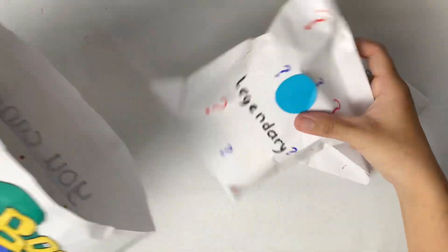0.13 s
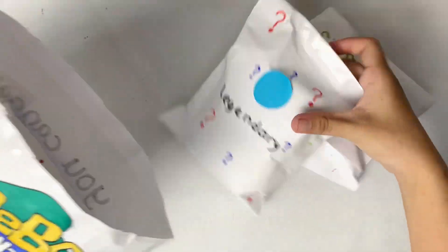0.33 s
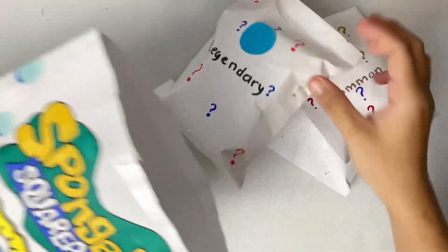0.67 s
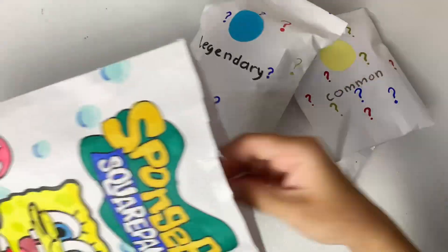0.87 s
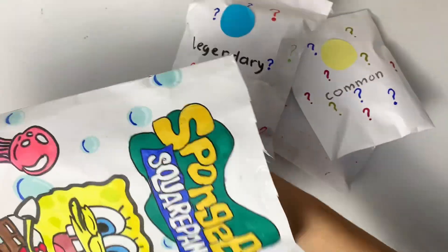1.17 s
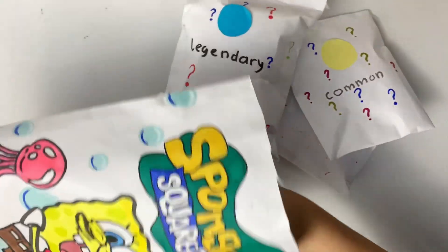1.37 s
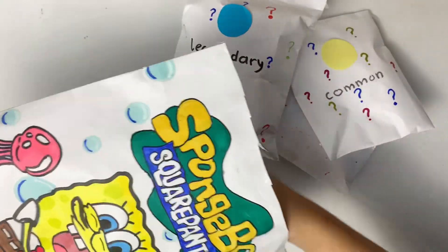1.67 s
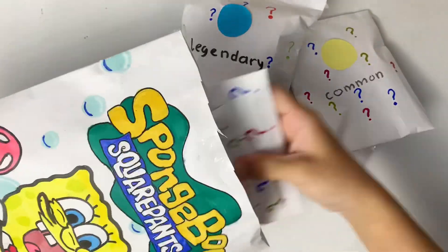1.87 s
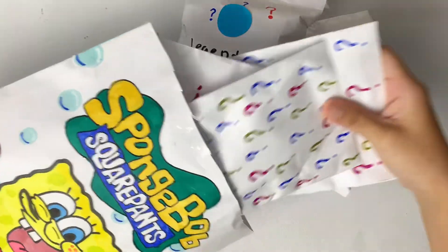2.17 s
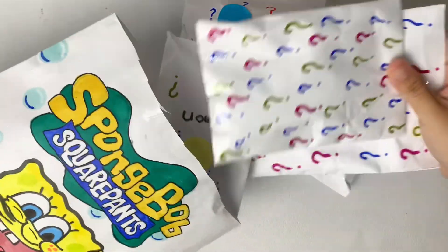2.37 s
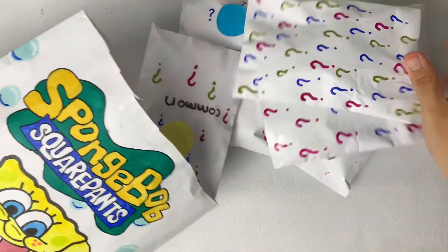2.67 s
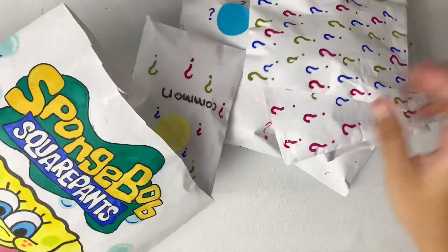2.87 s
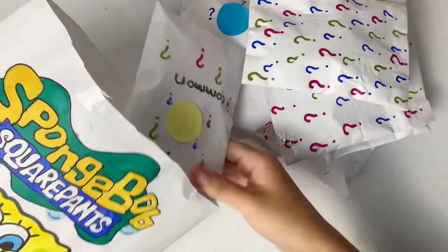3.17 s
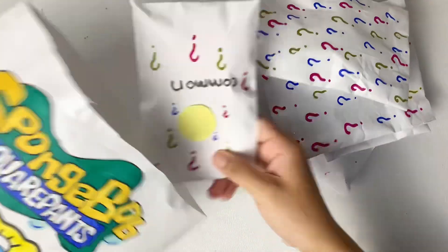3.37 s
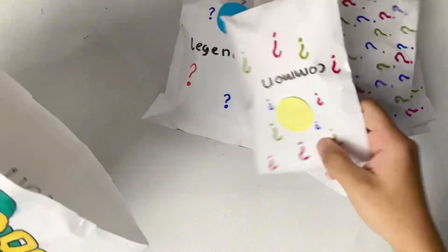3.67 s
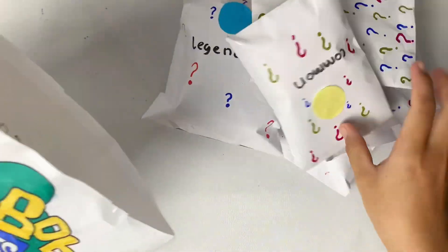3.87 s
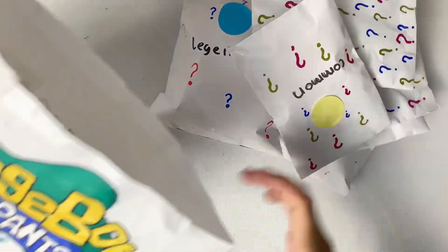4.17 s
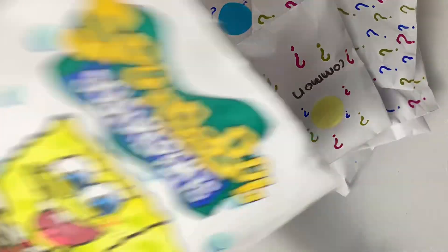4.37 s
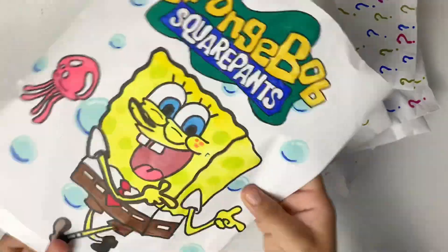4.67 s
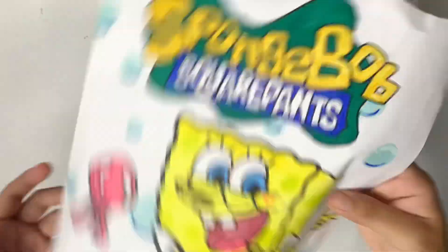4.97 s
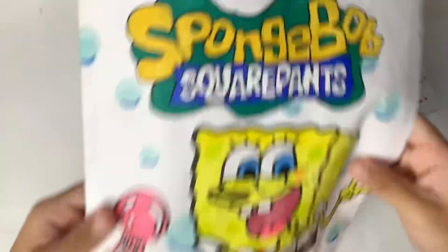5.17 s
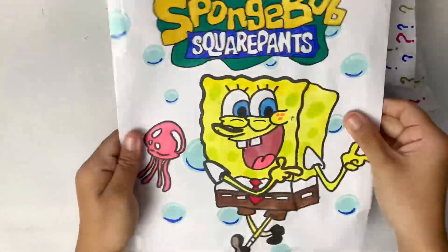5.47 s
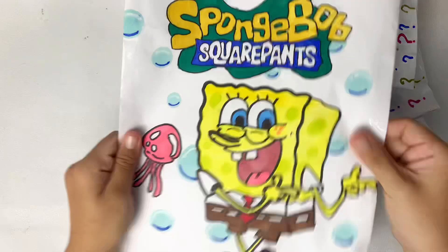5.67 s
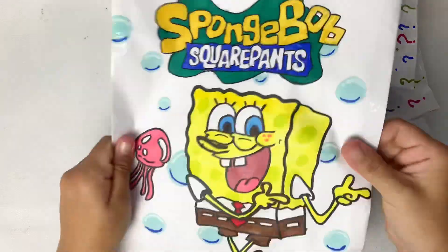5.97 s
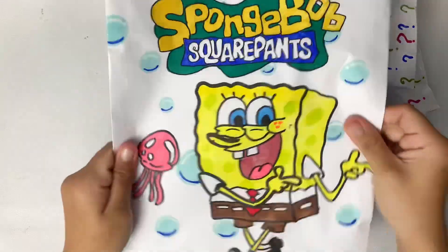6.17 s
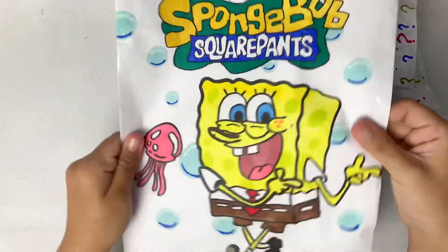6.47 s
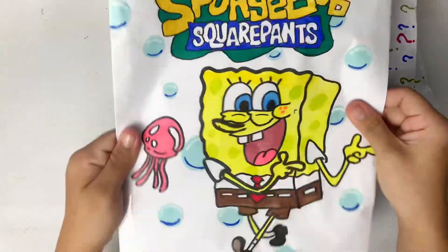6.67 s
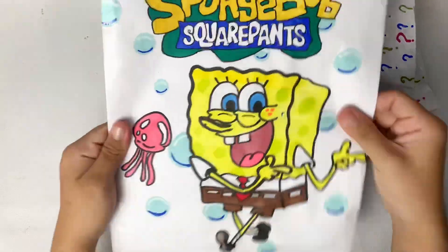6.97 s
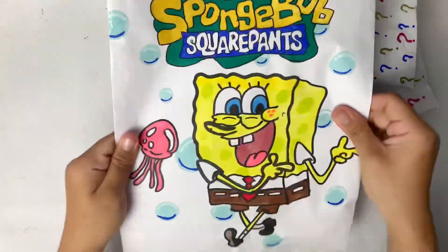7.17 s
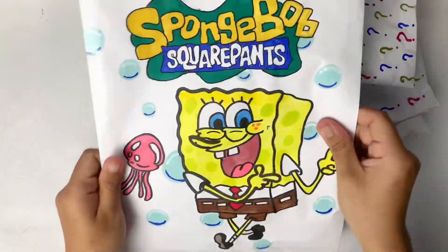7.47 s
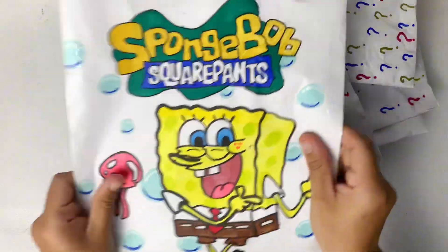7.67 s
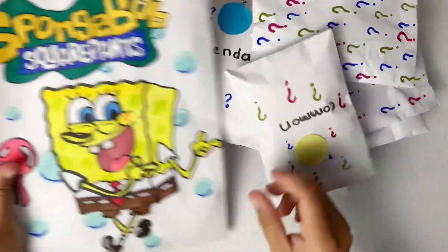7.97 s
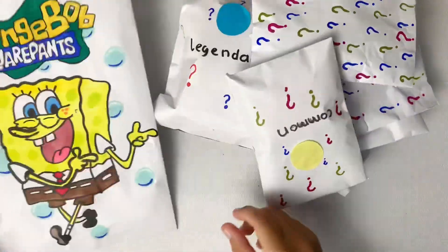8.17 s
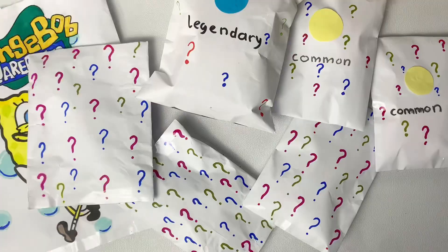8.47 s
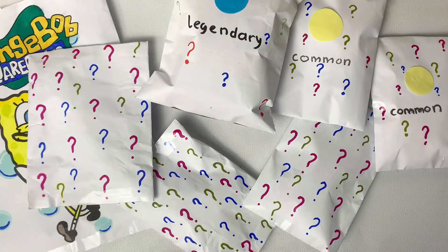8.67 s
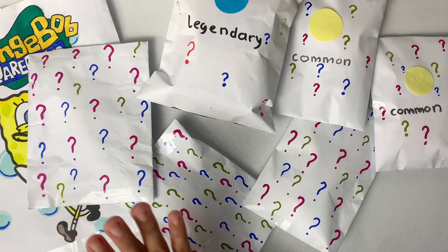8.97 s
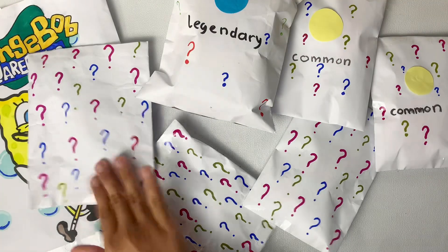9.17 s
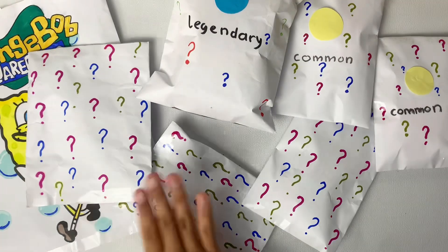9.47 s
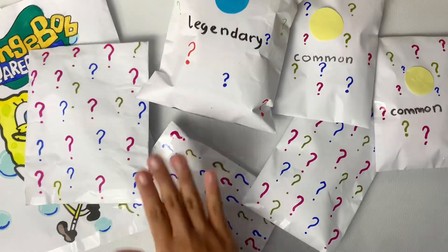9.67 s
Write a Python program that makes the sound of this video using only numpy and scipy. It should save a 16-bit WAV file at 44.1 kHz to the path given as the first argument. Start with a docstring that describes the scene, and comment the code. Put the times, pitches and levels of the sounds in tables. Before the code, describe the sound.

Stiff paper bags crinkle, snap and pop hollowly close to the microphone, slid from a big pouch that is then flexed, ending in soft pats over a low hum.

```python
"""Stiff paper snaps, flaps and pops hollowly right at the microphone, while sheets hiss and crinkle.
Handmade paper bags are slid out of a big pouch and laid on a table, the pouch is lifted and flexed,
and a hand pats the bags at the end. Noisy slips ring the resonances of the paper; noise and grains make it rustle.
A small room answers briefly with decaying noise. Under it all lie air and a low rumble of shaped noise,
joined from 8.46 s to the end by a drone of wavering sines. Two microphone ports pick it up."""
import sys
import numpy as np
from scipy import signal
from scipy.fft import rfft, irfft, next_fast_len
from scipy.io import wavfile

SR = 44100
rng = np.random.default_rng(int(sys.argv[2]) if len(sys.argv) > 2 else 0)


def generate_wav(sig):
    """Save sig (samples, or channels by samples) to the path in sys.argv[1] as 16-bit PCM at SR."""
    pcm = np.round(np.clip(np.atleast_2d(sig).T, -1, 1) * 32767).astype(np.int16)
    wavfile.write(sys.argv[1], SR, pcm)


N = 433062
TIME = np.arange(N) / SR

# buckles of the paper: (time [s], strength [dB], brightness [dB per octave], crispness [0-1])
BUCKLES = [(0.004, -15, 1, 0.42), (0.103, -35, 1, 0.8), (0.275, -28.5, -1.5, 0), (0.385, -30, -3, 0.4),
           (0.54, -26.5, 3, 0.2), (0.933, -13, 4.5, 0), (0.96, -18.5, -2, 0), (0.972, -11, 2.5, 0.5),
           (0.985, -22.5, 0, 0.81), (1.123, -21.5, 0, 0), (1.261, -19.5, 4.5, 0), (1.281, -14.5, 1.5, 0.7),
           (1.437, -15.5, 2.5, 0.2), (1.725, -20.5, -5, 0.7), (1.743, -14.5, 2, 0.2),
           (1.783, -14.5, 2.5, 0.1), (1.839, -15, 7.5, 0.64), (2.086, -17.5, 6.5, 0.3),
           (2.446, -26.5, -1.5, 0.4), (2.716, -18, 3.5, 0.43), (3.24, -13.5, 2, 0.6),
           (3.246, -13.5, 3, 0.78), (3.262, -15.5, 0.5, 0.82), (3.282, -15.5, 1.5, 0.95),
           (3.414, -21, 1, 0.2), (3.474, -17, 0.5, 0.1), (3.719, -21, -6, 0.6), (3.795, -29, 4, 0.8),
           (4.376, -23, 1, 0.26), (4.397, -17, 1, 0.4), (4.409, -14.5, 0.5, 0.4), (4.457, -11.5, 4, 0.52),
           (4.476, -8, 3, 0.51), (4.523, -27, -2, 0.5), (4.631, -18.5, 3, 0.5), (4.681, -10, -4.5, 0.26),
           (4.755, -21.5, 3, 0.1), (4.836, -19, -1.5, 0.35), (4.959, -20, -0.5, 0.37),
           (5.114, -17.5, 1, 0.0), (5.163, -12, 2.5, 0.27), (5.17, -12, 5.5, 0.73), (5.229, -15, 4, 0.5),
           (5.277, -14.5, -1, 0.56), (5.685, -13, 2, 0.46), (5.717, -21, 7, 1), (5.798, -16.5, -1, 0.1),
           (5.857, -21, 8.5, 0.45), (5.94, -11, 2, 0.5), (6.048, -15.5, -0.5, 0.1), (6.078, -17.5, 0, 0.1),
           (6.215, -10.5, 0.5, 0.58), (6.316, -20.5, 1, 0.1), (6.344, -17, -0.5, 0.3),
           (6.365, -18, -5.5, 0), (6.474, -12.5, 3.5, 0.83), (6.58, -19.5, -3.5, 0),
           (6.629, -19, -1.5, 0.2), (6.746, -10.5, 1.5, 0.63), (6.863, -21, -4, 0.05),
           (6.879, -19.5, -2, 0.1), (7.002, -14, 1, 0.1), (7.031, -15, 1, 0.5), (7.141, -14, -1.5, 0),
           (7.172, -21, -1.5, 0.3), (7.6, -25, 0, 0.5), (7.662, -13.5, 0, 0.79), (7.69, -14.5, 8, 0.91),
           (8.074, -20.5, -1, 0.47), (8.41, -31, 6, 0.7), (9.175, -25.5, 2.5, 0.82),
           (9.187, -15.5, 3.5, 0.63), (9.295, -21, 4.5, 0.46), (9.527, -23, 2, 0.76),
           (9.537, -27, 6.5, 0.5)]
# single creases that give way in one short click: (time [s], level [dB])
CREASE_CLICKS = [(0.947, -20.5), (1.088, -32), (1.273, -21), (1.33, -27.5), (1.398, -24.5), (1.5, -24),
                 (1.778, -21.5), (2.063, -25), (2.139, -24.5), (2.204, -28), (2.526, -27), (2.548, -33.5),
                 (2.574, -32), (2.674, -34), (2.7, -26.5), (4.502, -30.5), (4.612, -23.5), (4.621, -20),
                 (4.778, -25), (5.139, -30), (5.153, -20), (5.223, -21), (5.255, -23.5), (5.314, -23.5),
                 (5.535, -24), (5.554, -23), (5.673, -28.5), (5.787, -22), (5.887, -25), (5.917, -23),
                 (6.086, -22), (6.182, -26.5), (6.204, -24), (6.328, -24), (6.444, -26.5), (6.591, -32.5),
                 (6.64, -28), (6.717, -26), (6.988, -24), (7.049, -29), (7.092, -31), (7.273, -30),
                 (7.448, -33), (7.494, -25), (8.334, -25)]


def from_db(db):
    """Decibels to gain."""
    return np.exp(np.asarray(db) * (np.log(10) / 20))


def rms_one(x):
    """Scale to an rms of 1."""
    return x / np.sqrt(np.mean(x ** 2) + 1e-20)


def unit_burst(x):
    """Scale a short stereo sound to the energy of a hundredth of a second at an rms of 1."""
    return x / np.sqrt(np.sum(x ** 2) / 2 / (SR / 100))


def in_time(rows):
    """The columns of a curve, sample by sample."""
    s, *columns = np.transpose(rows)
    return [np.interp(TIME, s, column) for column in columns]


def at_hz(points, hz):
    """Read a spectrum on a log-frequency axis."""
    f, value = np.transpose(points)
    return np.interp(np.log(np.maximum(hz, 1)), np.log(f), value)


def drift(rate):
    """Smooth chance that changes about rate times a second; rms 1."""
    knots = rng.standard_normal(int(rate * N / SR) + 3)
    return rms_one(np.interp(TIME * rate, np.arange(len(knots)), knots))


def butterworth(hz, kind, order):
    """Butterworth filter sections with edges kept inside the audible range."""
    return signal.butter(order, np.clip(hz, 10, .45 * SR), kind, fs=SR, output="sos")


def cut(x, hz, kind, order=2):
    """Filter a sound with a Butterworth response."""
    return signal.sosfilt(butterworth(hz, kind, order), x)


def coloured(x, spectrum):
    """Weight a sound by a spectrum that falls away beyond its ends; rms 1."""
    size = next_fast_len(N)
    hz = np.arange(size // 2 + 1) * SR / size + 0.002   # the offset avoids dividing by zero
    low_skirt = 1 + (spectrum[0][0] / 1.3 / hz) ** 8
    high_skirt = 1 + (hz / (spectrum[-1][0] * 1.3)) ** 8
    weight = from_db(at_hz(spectrum, hz)) / high_skirt / low_skirt
    return rms_one(irfft(rfft(x, size) * weight, size)[..., :N])


def resonate(x, modes, shift, strengths_db):
    """Parallel resonances (Hz, width Hz, dB) of alternating sign, all moved by one factor."""
    out = 0
    for k, (hz, width, db) in enumerate(modes):
        r = np.exp(-np.pi * width / SR)
        w = 2 * np.pi * min(hz * shift, .45 * SR) / SR
        gain = (-1) ** k * from_db(db + strengths_db[k]) * (1 - r * r) / 2
        out = out + gain * signal.lfilter([1, 0, -1], [1, -2 * r * np.cos(w), r * r], x)
    return out


def stereo(pair, apart):
    """A common part and a share that differs between the ports."""
    return pair[0] + apart * pair[1] * np.array([[1], [-1]])


def room_air():
    """Steady, nearly central noise of the air in the room."""
    # spectrum of the air: (frequency [Hz], relative density [dB per Hz])
    air_spectrum = [(300, 21.2), (600, 8.3), (1100, 2), (1700, 7.9), (3000, 1), (15000, 2.1)]
    air = stereo(rng.standard_normal((2, N)), apart=0.015)
    return from_db(-53.5) * coloured(air, air_spectrum)


def low_rumble():
    """Low noise that slowly swells and sinks."""
    # level of the rumble: (time [s], level [dB])
    rumble_level = [(0, -39), (1.2, -33), (2.8, -39.5), (4.2, -33.5), (6.2, -37), (7.8, -41), (8.3, -34),
                    (9.3, -30), (9.82, -34.5)]
    # spectrum of the rumble: (frequency [Hz], relative density [dB per Hz])
    rumble_spectrum = [(25, -30), (45, -3), (62, 1.5), (100, -9.5), (180, -8.5), (260, -25.5), (700, -46)]
    rumble = stereo(rng.standard_normal((2, N)), apart=0.13)
    return from_db(in_time(rumble_level)[0]) * coloured(rumble, rumble_spectrum)


def late_drone():
    """Low sines wander in pitch and level, entering once and lasting to the end."""
    # partials of the drone: (centre frequency [Hz], relative level [dB])
    drone_partials = [(77, -0.5), (115, -7), (168, -20)]
    start_s, fade_in_s, level_db = 8.46, 0.025, -29
    drone = 0
    for hz, db in drone_partials:
        turns = np.cumsum(hz * (1 + 0.01674 * drift(9))) / SR
        level = np.sqrt(2) * from_db(db + 4.35 * drift(16))
        drone = drone + level * np.sin(2 * np.pi * turns)
    fade_in = np.clip((TIME - start_s) / fade_in_s, 0, 1)
    return from_db(level_db) * fade_in * drone


def room(x):
    """Diffuse echoes of a small room: decaying noise in bands, wider apart towards the treble."""
    # time to die away by 60 dB: (frequency [Hz], time [s])
    decay_times = [(150, 0.8), (1700, 0.21), (14000, 0.04)]
    t = np.arange(SR // 2) / SR
    edges = np.geomspace(90, 18000, 9)
    tail = 0
    for low, high in zip(edges, edges[1:]):
        echoes = stereo(rng.standard_normal((2, len(t))), apart=min(low / 700, 1))
        band = cut(echoes, [low, high], "band")
        decay_s = at_hz(decay_times, np.sqrt(low * high))
        tail = tail + band * from_db(-60 * t / decay_s)
    tail = tail * np.clip((t - .004) / 0.00067, 0, 1)   # the first echo arrives after 4 ms
    unit_tail = tail / np.sqrt(np.sum(tail ** 2) / 2)
    return signal.fftconvolve(x, unit_tail, axes=1)[:, :N]


def swells(rows, rise_db_per_s, fall_db_per_s):
    """Summed power of (start s, end s, dB) swells that rise, hold and fall."""
    t = TIME[::40]
    power = np.full(len(t), 1e-9)
    for start, end, db in rows:
        before_db = np.maximum(start - t, 0) * rise_db_per_s
        after_db = np.maximum(t - end, 0) * fall_db_per_s
        power += from_db(db - np.minimum(before_db + after_db, 150)) ** 2
    return np.interp(TIME, t, power)


def handling():
    """Rustle and hiss levels in dB: strokes raise both, buckles and creases set the sheet crinkling."""
    # a hand drags or bends paper: (start [s], end [s], rustle level [dB], fibre hiss level [dB])
    strokes = [(0.144, 0.22, -43, -52), (0.282, 0.437, -38.5, -47.5), (0.519, 0.538, -36, -45),
               (0.633, 0.85, -49, -59.5), (0.948, 0.995, -27.5, -40), (1.004, 1.235, -27.5, -38.5),
               (1.28, 1.296, -16, -28.5), (1.382, 1.568, -30, -40.5), (1.554, 1.824, -26.5, -28),
               (1.865, 2.02, -28.5, -32.5), (2.014, 2.243, -27.5, -29), (2.231, 2.37, -36.5, -38.5),
               (2.432, 2.62, -36, -53.5), (2.676, 2.721, -28.5, -39), (2.996, 3.072, -41, -51.5),
               (3.17, 3.241, -36, -45.5), (3.234, 3.455, -40, -36.5), (3.694, 3.711, -36.5, -34.5),
               (3.799, 3.824, -27, -38.5), (4.403, 4.501, -27.5, -42.5), (4.61, 4.693, -37.5, -36.5),
               (5.159, 5.305, -24.5, -39), (5.37, 5.646, -39, -51.5), (5.784, 5.961, -29, -59),
               (6.316, 6.344, -27, -40), (7.03, 7.163, -32, -46.5), (7.423, 7.504, -33, -45),
               (7.586, 7.84, -37, -74), (7.85, 8.013, -34.5, -47), (8.087, 8.29, -35.5, -49),
               (8.296, 8.4, -31.5, -42.5)]
    stroke_rise_db_per_s, stroke_fall_db_per_s = 715, 318
    # crinkling grows as the load builds and sinks as it relaxes
    crinkle_db, load_db_per_s, relax_db_per_s = -14, 2403, 333   # level relative to the buckle or crease
    start, end, rustle_db, hiss_db = np.transpose(strokes)
    rustle = swells(zip(start, end, rustle_db), stroke_rise_db_per_s, stroke_fall_db_per_s)
    hiss = swells(zip(start, end, hiss_db), stroke_rise_db_per_s, stroke_fall_db_per_s)
    around_folds = [(s, s, db + crinkle_db) for s, db, *_ in BUCKLES + CREASE_CLICKS]
    crinkle = swells(around_folds, load_db_per_s, relax_db_per_s)
    grip_db = 2.5 * drift(27)   # a hand never pulls evenly
    return 10 * np.log10(rustle + crinkle) + grip_db, 10 * np.log10(hiss) + grip_db


def fibres(catches_per_s, catch_db, size_db, flutter_db):
    """Hiss of two surfaces, with small catches, under an unsteady pressure."""
    sizes = from_db(size_db * np.minimum(rng.exponential(1, N), 4)) * rng.choice([-1, 1], N)
    catches = rms_one(sizes * (rng.random(N) < catches_per_s / SR))
    rub = stereo(rng.standard_normal((2, N)), apart=0.022)
    return (rub + from_db(catch_db) * catches) * from_db(flutter_db * drift(76))


def sheet(smooth, per_s, size_db, scatter_db, reach_db, patchy_db, cycles, count):
    """Modes of a sheet, driven by smooth rubbing and by tiny buckles that each favour one register."""
    crinkle_top_hz = 2200   # above this a sheet is mostly rubbed and hardly crinkles
    rub_low_hz = 705        # below this it mostly crinkles
    at = np.flatnonzero(rng.random(N) < per_s / SR)
    sizes_db = size_db * np.clip(rng.standard_normal(len(at)), -3, 1.6)
    register = rng.uniform(np.log2(150), np.log2(3000), len(at))   # small folds ring high, large ones low
    rubs = [np.sqrt(smooth) * stereo(rng.standard_normal((2, N)), apart=0.74) for _ in range(2)]
    pitches = np.geomspace(130, 4400, count) * np.exp(0.039 * rng.standard_normal(count))
    out = np.zeros((2, N))
    for k, hz in enumerate(pitches):
        scattered_db = scatter_db * rng.uniform(-2.7, 1, len(at))
        off_register_db = reach_db * np.abs(register - np.log2(hz))
        strengths = from_db(sizes_db + scattered_db - off_register_db)
        clicks = stereo(rng.choice([-1, 1], (2, len(at))) * strengths, apart=0.18)
        clicks = rms_one(clicks) * np.sqrt(N / len(at))   # sparse clicks with the power of steady noise
        drive = rubs[k % 2] * np.sqrt(hz / (hz + rub_low_hz))
        drive[:, at] += clicks * np.sqrt(1 - smooth[at]) / (1 + (hz / crinkle_top_hz) ** 2)
        # as the fingers move, each mode is freed and damped in turn
        freed = from_db(patchy_db * drift(9))
        out += resonate(drive * freed, [(hz, 15 + hz / cycles, 0)], 1, [0])
    # a bending sheet pulls its modes up and down: 6 ms of wander, about 7 bends a second
    bent_time = TIME + 0.006 * drift(7)
    return np.array([np.interp(bent_time, TIME, side) for side in out])


def sliding():
    """Freely sliding sheets hiss and rub smoothly; held and bent, they crinkle in grains."""
    # spectrum of the rustle: (frequency [Hz], relative density [dB per Hz])
    rustle_spectrum = [(100, 1.5), (200, 1.5), (420, -1), (720, 3.5), (1000, 1), (1600, 1), (2300, -2),
                       (3800, 1.5), (4700, -29.5)]
    # spectrum of the fibre hiss: (frequency [Hz], relative density [dB per Hz])
    hiss_spectrum = [(3800, -53), (4800, -1), (6200, 1.5), (8000, -3), (15500, 2)]
    full_load_db = -23   # rustle level at which the sheet crackles most
    rustle_db, hiss_db = handling()
    loose = np.clip(0.69 + (hiss_db - rustle_db) / 28, .06, .55)
    load = np.clip(from_db(rustle_db - full_load_db), 0, 1)
    # a lightly loaded sheet mostly rubs; a hard pressed one crackles
    smooth = np.clip(0.7 * loose + 0.35 * (1 - load) ** 3, 0, .7)
    rustle = sheet(smooth, per_s=210, size_db=5.5, scatter_db=4, reach_db=4, patchy_db=3.5,
                   cycles=19, count=26)
    # a loose sheet sounds thin, a taut one full and dark
    thin = cut(rustle, 560, "high", order=1)
    full = cut(rustle, 1200, "low", order=1)
    rustle = 1.02 * loose * thin + (1 - loose) * full
    hiss = fibres(catches_per_s=1800, catch_db=5.0, size_db=-2.0, flutter_db=1.5)
    return from_db(rustle_db) * coloured(rustle, rustle_spectrum) + from_db(hiss_db) * coloured(hiss, hiss_spectrum)


def creases():
    """A crease slips once and rings a few broad resonances, different for every fold."""
    slip_s, cycles = 0.0016, 7.2   # decay of the slip; pitch over width of the resonances
    low_hz, high_hz, tilt_db = 515, 3560, -7.5   # nominal range, and slope per octave
    out = np.zeros((2, N + SR))
    t = np.arange(SR // 10) / SR
    for s, db in CREASE_CLICKS:
        slip = stereo(rng.standard_normal((2, len(t))), apart=0.19) * np.exp(-t / slip_s)
        pitches = np.geomspace(low_hz, high_hz, num=8) * np.exp(0.11 * rng.standard_normal(size=8))
        modes = [(hz, hz / cycles, tilt_db * np.log2(hz / low_hz)) for hz in pitches]
        ring = resonate(slip, modes, 1, 2 * rng.standard_normal(len(modes)))
        ring = cut(ring, 2 * high_hz, "low")
        at = int(s * SR)
        out[:, at:at + len(t)] += from_db(db) * unit_burst(ring)
    return out[:, :N]


def pops():
    """A whole panel flips through with one hollow, decaying note, the large low ones longest."""
    # flips of a panel: (time [s], pitch [Hz], level before the envelope [dB])
    panel_flips = [(1.28, 180, -8), (1.436, 1560, 1), (1.786, 154, -13), (3.474, 747, -6),
                   (4.681, 317, -3.5), (5.687, 116, -7.5), (5.941, 656, 1.5), (6.217, 251, -9),
                   (6.745, 715, -5), (7.141, 615, -9.5)]
    ring_s, rise_s = 0.099, 0.001   # decay before division by the square root of the pitch; attack
    out = np.zeros(N + SR)
    t = np.arange(SR // 10) / SR
    for s, hz, db in panel_flips:
        envelope = (1 - np.exp(-t / rise_s)) * np.exp(-t * np.sqrt(hz) / ring_s)
        at = int(s * SR)
        out[at:at + len(t)] += from_db(db) * envelope * np.sin(2 * np.pi * hz * t)
    return out[:N]


LEAD = SR // 25   # samples of creaking before a buckle


def buckle(spread_s, rise_s, creak_db, creak_s, after_db, after_s, grit_db, stutter_db):
    """Force of one buckle: the fold creaks under load, gives way in a run of slips, then settles."""
    t = np.arange(-LEAD, SR // 10) / SR
    before = t < 0
    grit = from_db(grit_db * rng.standard_normal(len(t)))
    slips = rms_one(rng.standard_normal((2, len(t))) * grit)
    knots = np.linspace(t[0], t[-1], num=48)
    stutter = from_db(stutter_db * np.interp(t, knots, rng.standard_normal(48)))
    giving = np.exp(-np.abs(t) / np.where(before, rise_s, spread_s))
    straining = np.where(before, from_db(creak_db), from_db(after_db))
    straining = straining * np.exp(-np.abs(t) / np.where(before, creak_s, after_s))
    force = slips * (giving + straining * stutter)
    force[0, LEAD] += 11.9 * rng.choice([-1, 1])   # one sharp kick, common to both ports
    return force


def part_levels(strength_db, brightness, crisp):
    """Thump, flap, crack and tick in dB: brightness tilts the first three, crispness lifts the tick."""
    # shares of bag thump, panel flap and crease crack: (distance from the flap [octaves], share [dB])
    shares = [(-1.67, -6.5), (-0.62, -3.5), (1.58, -7.5)]
    dull_tick_db, crisp_tick_db = -38.5, 0   # tick of the fibres in the dullest and the crispest buckle
    octaves, share_db = np.transpose(shares)
    tilted_db = share_db + brightness * octaves
    tilted_db = tilted_db - 10 * np.log10(np.sum(from_db(tilted_db) ** 2))   # together 0 dB
    tick_db = dull_tick_db + crisp * (crisp_tick_db - dull_tick_db)
    return strength_db + np.append(tilted_db, tick_db)


def snaps():
    """Each buckle rings bag, panel, crease and fibres; the crisp ones are the most abrupt."""
    # resonances of bag, panel, crease and fibres: (frequency [Hz], width [Hz], level [dB])
    thump_modes = [(100, 86, 4.5), (216, 120, -7), (324.3, 39, 4.5)]
    flap_modes = [(523, 220, -7.5), (665, 115, 3.5), (899, 150, -3.5)]
    crack_modes = [(1165, 150, 0), (1743, 354, -6.5), (2600, 1500, -16.5), (3680, 480, -13)]
    tick_modes = [(5350, 900, 17.5), (11460, 13000, 3)]
    # (modes, band [Hz], share that differs between the ports)
    parts = [(thump_modes, [55, 480], .08), (flap_modes, [430, 1050], .22),
             (crack_modes, [950, 4100], .4), (tick_modes, [4600, 17000], .3)]
    bands = [butterworth(band_hz, "band", 3) for _, band_hz, _ in parts]
    crisp_tilt_db = 13   # per octave: a crisp buckle favours the higher modes of each part
    out = np.zeros((2, N + SR))
    for s, strength_db, brightness, crispness in BUCKLES:
        crisp = np.clip(crispness, 0, 1)
        levels = part_levels(strength_db, brightness, crisp)
        force = buckle(spread_s=0.0096 * np.exp(-2 * crisp), rise_s=0.0016, creak_db=-8, creak_s=0.0066,
                       after_db=-7.0 - 11.0 * crisp, after_s=0.016, grit_db=0.0, stutter_db=7.0)
        shift = np.exp(0.085 * rng.standard_normal())   # the bent sheet is never equally stiff
        at = int(s * SR)
        for level_db, (modes, _, apart), band in zip(levels, parts, bands):
            octaves = np.log2([hz for hz, _, _ in modes])
            chance_db = 4.03 * rng.standard_normal(len(modes))
            strengths_db = chance_db + crisp_tilt_db * (crisp - 0.3) * octaves
            ring = resonate(stereo(force, apart), modes, shift, strengths_db)
            ring = signal.sosfilt(band, ring)
            out[:, at:at + ring.shape[1]] += from_db(level_db) * unit_burst(ring)
    return out[:, LEAD:LEAD + N]


def through_pouch(paper):
    """The thick pouch is duller than the small bags: blend in a darkened copy of equal rms."""
    # how much of the sound is the pouch: (time [s], share [0-1])
    pouch_share = [(4.2, 0.1), (4.4, 0.61), (7.2, 0.8), (7.45, 0)]
    dull_spectrum = [(20, 7.5), (6500, 9.0), (11000, -11.5), (18000, -36.5)]   # (Hz, dB)
    share = np.clip(in_time(pouch_share)[0], 0, 1)
    dulled = coloured(paper, dull_spectrum) * np.sqrt(np.mean(paper ** 2))
    return (1 - share) * paper + share * dulled


def scene():
    """Background, the answer of the room, and the paper close to the microphone."""
    background = low_rumble() + room_air() + late_drone()
    paper = through_pouch(sliding() + creases() + pops() + snaps())
    return background + from_db(-20.0) * room(paper) + paper


def record(dry):
    """The two ports differ in phase and level; peaks are rounded and the top is cut."""
    # lag of the right port: (frequency [Hz], phase [radians])
    port_phase = [(0, 0), (820, .3), (1030, 4.0), (1950, 6.3), (3700, 8.0), (4750, 9.42), (15400, 25.13)]
    # left minus right port: (frequency [Hz], level [dB])
    port_balance = [(100, 0.5), (450, 3), (720, 2), (920, 7), (1300, -1), (2300, -2.5), (4000, 0)]
    size = next_fast_len(N + SR // 4)
    hz = np.arange(size // 2 + 1) * SR / size
    lean = from_db(at_hz(port_balance, hz))
    lag = np.interp(hz, *np.transpose(port_phase))
    ports = np.array([lean, np.exp(-1j * lag)]) * np.sqrt(2 / (1 + lean ** 2))   # total power is kept
    heard = irfft(rfft(dry, size) * ports, size)[:, :N]
    rounded = heard / (1 + heard ** 6) ** (1 / 6)
    top_cut = signal.ellip(10, .1, 80, 15900, fs=SR, output="sos")   # steep low-pass at 15.9 kHz
    return signal.sosfilt(top_cut, rounded)


dry = scene()
out = record(dry)
generate_wav(out)
```